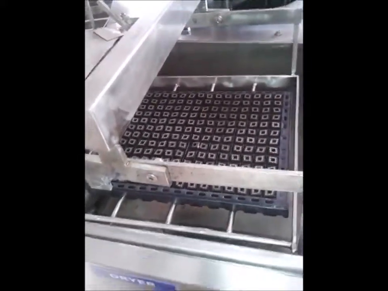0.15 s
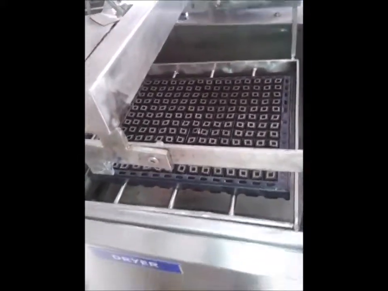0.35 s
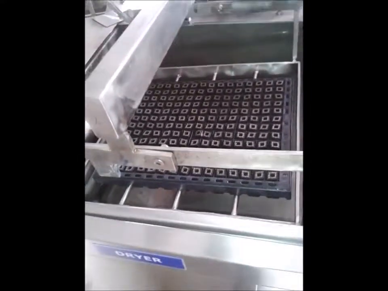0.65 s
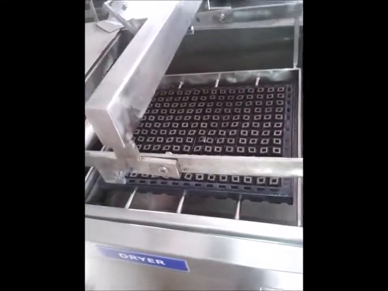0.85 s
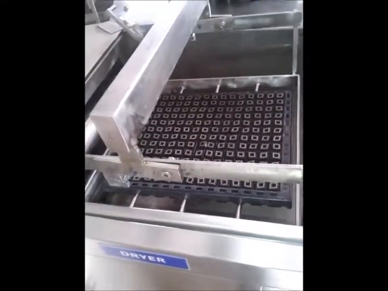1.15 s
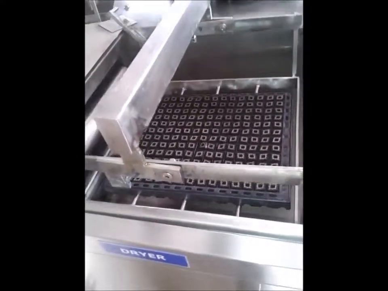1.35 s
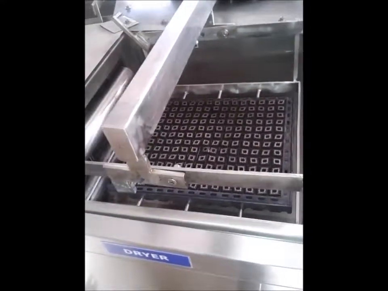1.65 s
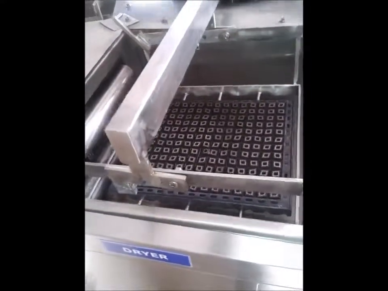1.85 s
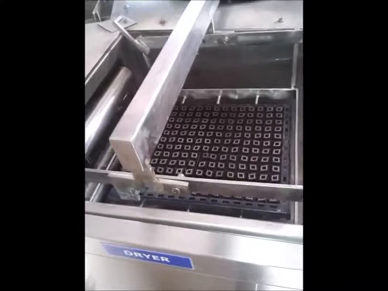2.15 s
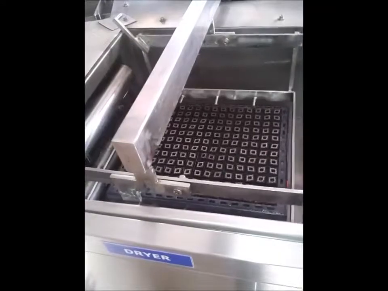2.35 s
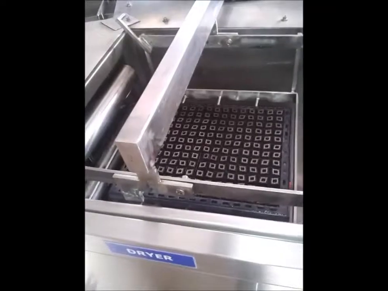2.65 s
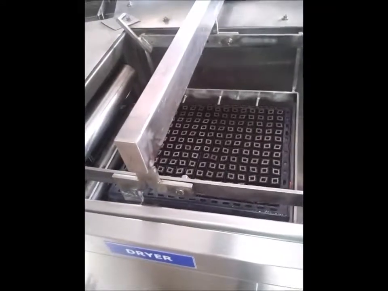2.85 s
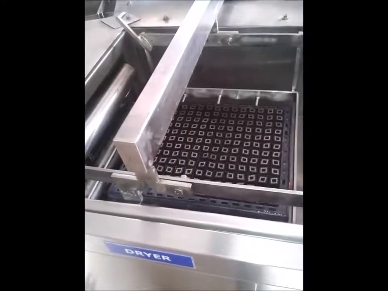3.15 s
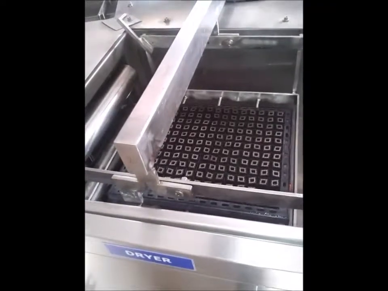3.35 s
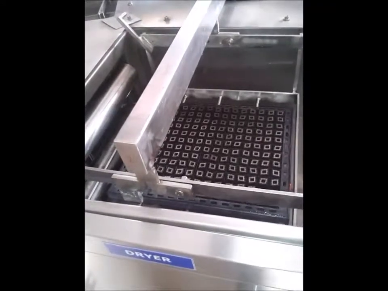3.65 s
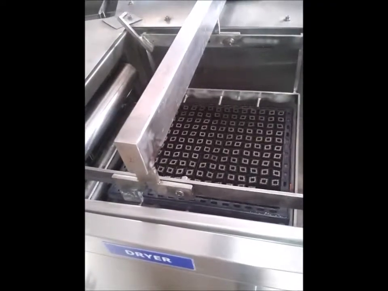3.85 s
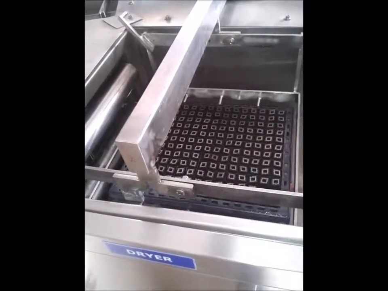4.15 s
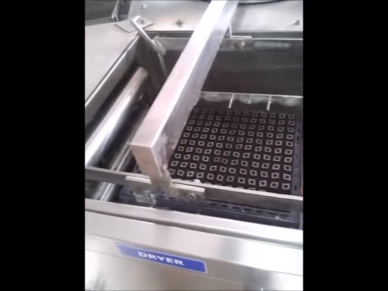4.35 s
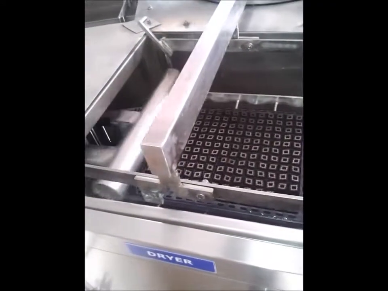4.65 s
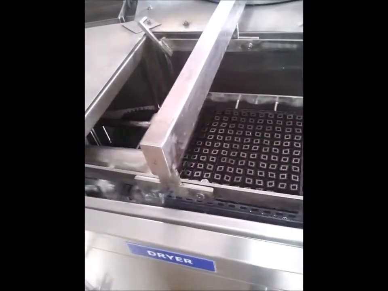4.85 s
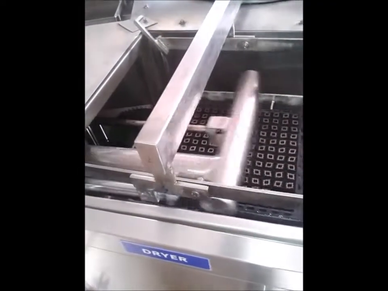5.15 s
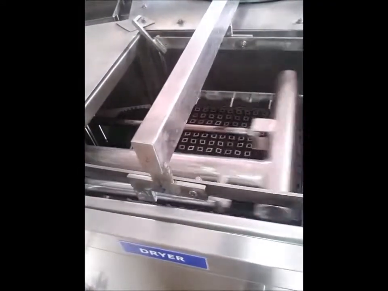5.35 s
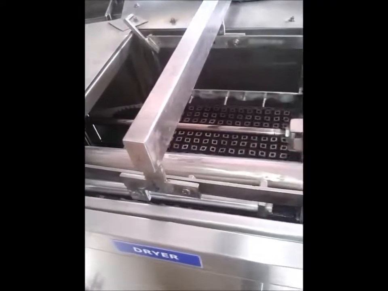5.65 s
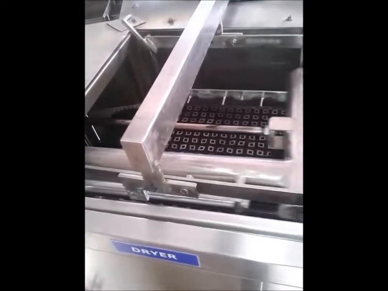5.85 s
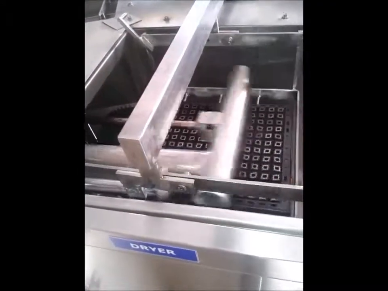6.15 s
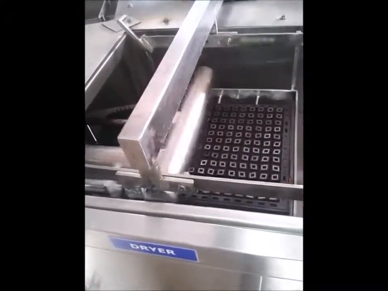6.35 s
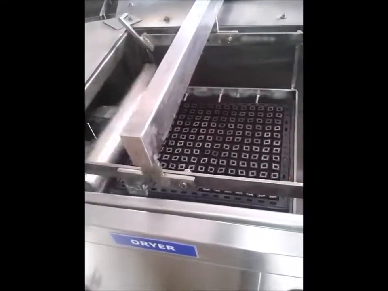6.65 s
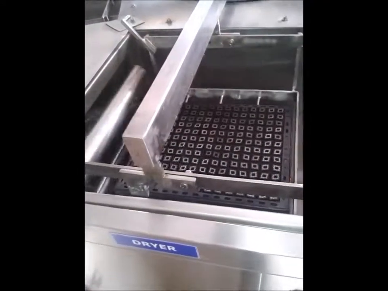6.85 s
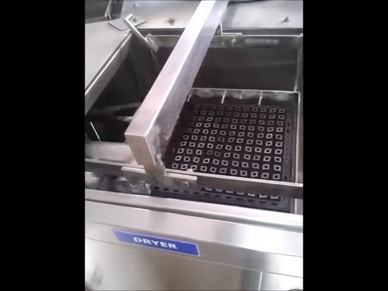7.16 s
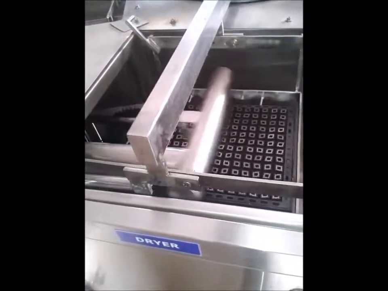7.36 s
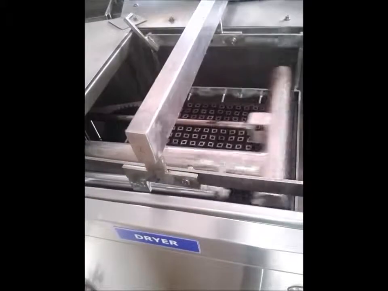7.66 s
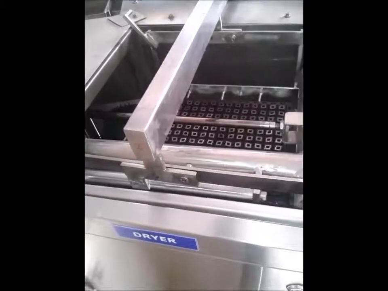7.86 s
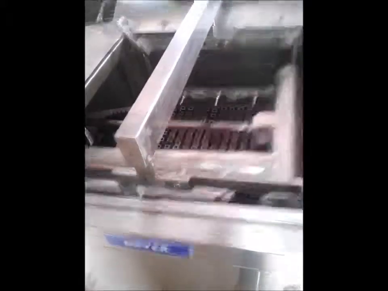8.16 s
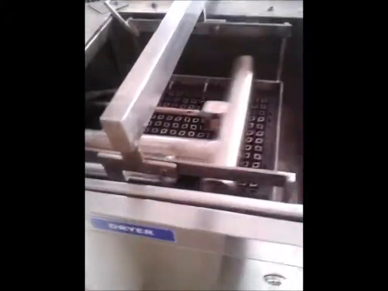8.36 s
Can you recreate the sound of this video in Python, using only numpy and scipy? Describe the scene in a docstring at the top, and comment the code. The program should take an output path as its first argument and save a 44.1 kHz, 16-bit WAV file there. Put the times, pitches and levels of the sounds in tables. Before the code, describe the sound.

A strong, steady hiss of compressed air with faint thin whistles and midrange blower roar comes first, becoming softer and narrower. It shuts off suddenly; after a brief stutter, cavitation bubbles sizzle in rapid hundred-per-second bursts, with a shrill buzzing squeal around six kilohertz and a faint low hum. Close, mono, bass-light, distorting small microphone, little sense of room.

```python
"""In a factory, a parts washer is heard close by through one small microphone that overloads.
First a jet of compressed air hisses as shaped noise, with thin tones, amid the roar of blowers.
Then the ultrasonic tank takes over: cavitation bubbles collapse in bursts on every half-wave of the mains,
as noise under a spiky envelope, and the tank squeals in combs of lines chopped at the same rate.
A low mains-rate hum sounds in wavering sines, louder while the tank squeals."""
import sys
import numpy as np
from scipy import signal
from scipy.io import wavfile
from scipy.ndimage import uniform_filter1d, map_coordinates

SR = 44100
rng = np.random.default_rng(int(sys.argv[2]) if len(sys.argv) > 2 else 0)


def store_wav(level_fs):
    """Save 16-bit WAV to argv[1]."""
    pcm = np.round(np.clip(np.atleast_2d(level_fs), -1, 1) * 32767)
    wavfile.write(sys.argv[1], SR, pcm.T.astype(np.int16))


N = 374409
T = np.arange(N) / SR  # time in seconds
CHOP_HZ = 100.0  # half-waves of the mains per second

# Cavitation in the tank. Each row: time in seconds, fizz level in dB, level of the rattling walls in dB,
# burstiness in dB (negative counts as none), chop by the half-wave in dB.
CAVITATION = [(2.36, -26.5, -27, 1, -1), (2.41, -15, -44, 4, -1), (2.5, -22.5, -32, 4, 1),
              (2.57, -14.5, -23.5, 5, 4), (2.65, -21, -28.5, 5.5, 0.5), (2.7, -26, -26.5, -7, 0),
              (2.79, -20, -23.5, 1, 0.5), (2.85, -15.5, -25.5, 3.5, 0.5), (3.1, -17, -27, 4, 0.5),
              (3.2, -19, -26.5, 5, 2.5), (3.59, -18, -27, 5, 1.5), (3.8, -14, -22.5, 2, 1),
              (3.92, -17, -26, 4, 2), (4.18, -20, -26.5, 7, 3.5), (4.36, -16, -22.5, 4, -2),
              (4.55, -16, -24.5, 5, 7.5), (4.85, -16, -25.5, 5, 1), (5.1, -15, -23, 2, 0),
              (5.55, -14.5, -25.5, 1, 0), (5.7, -15.5, -21, 4, 2), (6.1, -18.5, -26, 5.5, 3),
              (6.25, -15.5, -25, 4.5, 3.5), (6.5, -15, -23.5, 3.5, 1.5), (6.8, -16.5, -24.5, 5.5, 1.5),
              (7.1, -17, -25, 5, -0.5), (7.2, -14.5, -25, 2.5, -1), (7.5, -15, -25.5, 1, -0.5),
              (7.95, -16.5, -26, 5, 3), (8.49, -16.5, -27.5, 4.5, 0)]


def gain_of(db):
    """Amplitude ratio of a level: twenty decibels to each factor of ten."""
    return 10 ** (np.asarray(db) / 20)


def evened(x):
    """Normalization of a signal to an rms of 1."""
    return x / np.sqrt(np.mean(np.abs(x) ** 2) + 1e-20)


def curves(rows):
    """Linear interpolation of columns over time, with a soft gate open while the table lasts."""
    s, *columns = np.transpose(rows)
    # A table that reaches an end of the sound has no fade there.
    since_start = T - s[0] + (s[0] == 0)
    until_end = s[-1] - T + (s[-1] > T[-1] - .02)
    gate = np.clip(np.minimum(since_start, until_end) / .015, 0, 1)
    return gate, [np.interp(T, s, c) for c in columns]


def wander(hz, t=T):
    """Band-limited random modulation: a spline through hz random values a second, rms about 1."""
    knots = np.linspace(0, N / SR, 2000)
    smooth = map_coordinates(rng.standard_normal(400), [knots * hz], order=3, mode="wrap")
    return np.interp(t, knots, smooth)


def noise(points, patchy_db):
    """Spectral shaping of noise: random short-time spectra with drifting patches, rms 1."""
    frames, hz = N // 256 + 5, np.fft.rfftfreq(1024, 1 / SR)
    real, imaginary, patches = rng.standard_normal((frames, 513, 3)).T
    patches = uniform_filter1d(patches, size=12, axis=0)
    patches = evened(uniform_filter1d(patches, size=12, axis=1))
    f, db = np.transpose(points)
    shape_db = np.interp(np.log(hz + 1), np.log(f), db)[:, None]
    spectra = (real + 1j * imaginary) * gain_of(shape_db + patchy_db * patches)
    return evened(signal.istft(spectra, nperseg=1024, noverlap=768)[1][:N])


def swell(start, rise, hold, fall, db, change_db):
    """Amplitude envelope of one event: rise, hold with a slow change of level, fall."""
    t = T - start
    rising = t / max(rise, .005)
    falling = (rise + hold + fall - t) / max(fall, .005)
    edge = np.clip(np.minimum(rising, falling), 0, 1)
    held = np.clip((t - rise) / max(hold, .005), 0, 1)
    return edge ** 1.03 * gain_of(db + change_db * held)


def swells(rows):
    """Power sum of the envelopes of a series of events."""
    return np.sqrt(sum(swell(*row) ** 2 for row in rows))


def half_waves():
    """Phase of the mains rectification: the count of half-waves, shifted by a drifting delay."""
    # Drift of the strongest burst within the half-wave. Each row: time in seconds, delay in milliseconds.
    burst_delay = [(2.36, 4.5), (2.6, 4.6), (3.08, 6.6), (4.2, -.9), (4.4, 2.2), (4.64, 1.7), (4.76, -.1),
                   (4.88, 1.4), (5.72, 3.1), (5.84, 4.4), (6.08, .6), (6.32, 3.2), (6.44, 3.2), (6.7, 11),
                   (7.64, 7.1), (7.88, 3.9), (8.12, 2.8), (8.49, 3)]
    return CHOP_HZ * (T - curves(burst_delay)[1][0] / 1000)


def burst_envelope(mains):
    """Amplitude modulation by cavitation: two uneven, spiky bursts a half-wave over a simmer; rms 1."""
    burst_db, throb_db = curves(CAVITATION)[1][2:]
    slot = np.floor(2 * mains + .5).astype(int)  # number of each burst
    size = np.minimum(rng.standard_normal(2000)[slot], 1.3)
    pulse = np.cos(2 * np.pi * mains) ** 2
    spikes = uniform_filter1d(rng.standard_normal(N), size=40)
    spikes = evened(uniform_filter1d(spikes, size=40))
    clumps = .15 * wander(40)
    field = 1.3 * pulse + 0.33 * size * pulse + .5 * spikes + clumps
    level_db = np.clip(burst_db, 0, 12) * field + throb_db * np.cos(2 * np.pi * mains)
    bursts = gain_of(level_db) + 0.13  # steady simmer
    return bursts / np.sqrt(uniform_filter1d(bursts ** 2, size=3500))


def dips():
    """Amplitude modulation by brief Gaussian drops in level, in dB."""
    # Each row: time in seconds, half width in seconds, nominal depth in dB.
    brief_dips = [(2.58, 0.022, -5.5), (2.8, 0.02, -5), (3.14, 0.016, -2.5), (3.385, .015, -2),
                  (4.205, 0.019, -6.5), (4.75, 0.0094, -9), (4.816, .015, -4.5), (5.66, 0.03, -2.5),
                  (6.07, 0.042, -3), (6.35, 0.021, -6), (6.63, 0.036, -4.5), (6.755, .03, -5),
                  (7.005, 0.029, -3), (7.12, 0.032, -4), (8.16, 0.024, -1.5)]
    return sum(db * np.exp(-((T - s) / width) ** 2) for s, width, db in brief_dips)


def bubbles(bursts, squeal_db, dip_db):
    """Cavitation noise: each burst sprays fizz, rings harshly and shakes the tank walls."""
    # Spectra of the fizz, walls and ring. Each row: frequency in Hz, relative density in dB per Hz.
    fizz_spectrum = [(710, -15.5), (1200, -11), (2830, -13), (4160, -9), (4880, -7), (6050, -1.5),
                     (7340, -11.5), (8170, -13), (9900, -12.5), (11500, -3), (13100, -15), (15500, -15.5)]
    wall_spectrum = [(15, -55), (25, -40), (64, -45), (91, -58), (162, -48.5), (193, -13.5), (262, -5),
                     (409, 0.5), (715, 0.5), (1600, -9.5), (2500, -13.5), (3250, -11), (5500, -120)]
    ring_spectrum = [(4300, -46), (5200, 1), (5900, -3), (6300, 3.5), (7000, -8), (8200, -21)]
    # Ringing as the tank starts. Each row: start, rise, hold and fall in seconds, level in dB,
    # change over the hold in dB.
    start_ringing = [(2.355, .01, .01, .04, -16, 0), (2.49, 0.051, .09, .04, -16, 0)]
    flicker_hz = 24.92
    gate, (fizz_db, walls_db, _, _) = curves(CAVITATION)
    flicker_db = 0.71 * wander(flicker_hz)  # shared by fizz and walls
    ring_db = 3 * wander(flicker_hz) + dip_db
    # The ring grows with the squeal up to a knee at -10 dB, then yields as the tone locks.
    over_db = squeal_db + 10
    harsh = gain_of(-18.5 + 0.5 * np.minimum(over_db, 0) - 0.58 * np.maximum(over_db, 0))
    ring = np.hypot(harsh, swells(start_ringing)) * noise(ring_spectrum, patchy_db=.8)
    fizz = gain_of(fizz_db + flicker_db + 0.7 * dip_db) * noise(fizz_spectrum, patchy_db=0.7)
    walls = gain_of(walls_db + flicker_db + 1.1 * dip_db) * noise(wall_spectrum, patchy_db=0.5)
    return gate * ((fizz + gain_of(ring_db) * ring) * bursts + walls * bursts ** 0.94)


def squeal(level, pitch, mains, spread_hz, sweep, skirt, shaky_db, shake_hz, rough):
    """Periodic restarting of a tone: lines a chop apart under a moving hump, swept within the burst."""
    on = level > 0
    hz, centre_hz = (c[on] for c in curves(pitch)[1])
    turns, tone, power = np.cumsum(hz) / SR, 0, 0
    for k in range(-6, 10):
        off = (hz + k * CHOP_HZ - centre_hz) / spread_hz + 0.45  # the hump sits just under the centre
        hump = np.exp(-off ** 2 / 2) + skirt / (1 + (off - 1.5) ** 2 / 9)  # the skirt reaches further upward
        height = hump * gain_of(shaky_db * wander(shake_hz, T[on]))
        # Phase that grows as the square of the offset sweeps the pitch.
        phase = 2 * np.pi * (turns + k * mains[on]) + sweep * off ** 2 + 0.4 * wander(shake_hz, T[on])
        tone = tone + height * np.cos(phase)
        power = power + height ** 2 / 2
    # Random modulation smears part of each line into hiss.
    blur = evened(uniform_filter1d(rng.standard_normal(len(hz)), size=150))
    out = np.zeros(N)
    out[on] = tone / np.sqrt(power) * (np.sqrt(1 - rough) + np.sqrt(rough) * blur)
    return level * out


def main_squeal_level():
    """Amplitude envelope of the main comb: the squeals, and a sputter between them."""
    # Each row: start, rise, hold and fall in seconds, level in dB, change over the hold in dB.
    main_events = [(2.54, 0.2, 0.043, .07, -4.5, 0), (2.88, 0.22, 0.011, 0.071, -12, -3),
                   (3.64, 0.097, 0.084, 0.14, -6.5, 0), (3.99, 0.13, .11, .03, -20, -6),
                   (4.17, 0.27, .25, .14, -7, -6.5), (4.83, .11, 0.76, 0.16, -6, -0.5),
                   (5.72, 0.11, .01, 0.12, -7.5, -2), (5.92, 0.062, .01, 0.096, -16.5, 2.5),
                   (6.18, 0.051, 0.32, .14, -9, -1), (6.6, .04, 0.094, .03, -25, -2),
                   (6.77, 0.4, 0.38, 0.43, -9.5, 1), (7.84, .15, 0.076, 0.086, -13.5, -5)]
    # One row: start and end in seconds, level in dB, random spread in dB, rate in Hz.
    sputtering = (3, 7, -28.5, 7.5, 32)
    start, end, db, spread_db, hz = sputtering
    sputter = ((T > start) & (T < end)) * gain_of(db + spread_db * wander(hz))
    return np.hypot(swells(main_events), sputter)


def main_squeal(level, mains):
    """Line spectrum of the strongest squeal: a narrow, nearly pure comb."""
    # Each row: time in seconds, frequency of one line in Hz, centre of the comb in Hz.
    main_pitch = [(2.5, 5872, 6075), (2.8, 5872, 6085), (2.9, 5852, 6095), (3.1, 5848, 6045),
                  (3.7, 5900, 6005), (3.9, 5903, 6010), (4.15, 5905, 6060), (4.35, 5901, 5990),
                  (4.5, 5891, 5950), (4.7, 5884, 5955), (4.85, 5882, 5985), (5.0, 5859, 5910),
                  (5.5, 5859, 5890), (5.8, 5861, 5990), (6.0, 5876, 6060), (6.3, 5870, 5985),
                  (6.7, 5868, 5890), (6.9, 5868, 5945), (7.1, 5861, 5900), (7.3, 5860, 5940),
                  (7.7, 5871, 6020), (8.0, 5874, 5920), (8.3, 5874, 5945)]
    return squeal(level, main_pitch, mains, spread_hz=86.6, sweep=0.693, skirt=0.35,
                  shaky_db=3.1, shake_hz=6.6, rough=0.011)


def upper_squeal(mains):
    """Line spectrum of a higher squeal: a wide comb, largely smeared into hiss."""
    # Each row: start, rise, hold and fall in seconds, level in dB, change over the hold in dB.
    upper_events = [(2.785, .035, .14, .14, -23.5, 1), (3.07, .02, .01, .045, -20, 0),
                    (3.14, .025, .53, 0.071, -23, 1), (3.87, .09, 0.093, .08, -23, -3)]
    # Each row: time in seconds, frequency of one line in Hz, centre of the comb in Hz.
    upper_pitch = [(2.78, 7093, 7480), (3.05, 7085, 7400), (3.17, 7040, 7330), (3.45, 7031, 7330),
                   (3.55, 7002, 7480), (3.85, 7000, 7400), (4.12, 7015, 7430)]
    return squeal(swells(upper_events), upper_pitch, mains, spread_hz=300, sweep=2.2, skirt=.3,
                  shaky_db=4, shake_hz=20, rough=.6)


def start_squeal(mains):
    """Line spectrum of the highest squeal, as the tank starts: a comb of very unsteady lines."""
    # Each row: start, rise, hold and fall in seconds, level in dB, change over the hold in dB.
    start_events = [(2.38, .055, .01, .06, -20, 0), (2.48, 0.045, 0.235, 0.047, -26.5, 9)]
    # Each row: time in seconds, frequency of one line in Hz, centre of the comb in Hz.
    start_pitch = [(2.38, 11595, 11800), (2.52, 11598, 11830), (2.6, 11645, 11930), (2.68, 11655, 11500),
                   (2.86, 11650, 11350)]
    return squeal(swells(start_events), start_pitch, mains, spread_hz=165, sweep=0.89, skirt=.15,
                  shaky_db=14, shake_hz=15, rough=0.14)


def jet():
    """Turbulent noise of the air jet; the spectrum changes from open to throttled with the valve."""
    # Each row: time in seconds, level in dB, openness from 0 (throttled) to 1 (bright).
    valve = [(0, -7, 0.96), (.56, -9.5, 0.95), (.8, -8.5, 0.89), (1.0, -10, 0.85), (1.15, -13.5, .24),
             (1.4, -14, .05), (2.0, -12.5, .15), (2.2, -13, 0.27), (2.35, -10.5, 0.25), (2.375, -22, .2),
             (2.5, -29, .2)]
    # Open and throttled spectra. Each row: frequency in Hz, relative density in dB per Hz.
    open_spectrum = [(2500, -42), (3700, -20.5), (4100, -10), (5000, -12), (5350, -1), (5850, 0.5),
                     (6350, -3.5), (6900, -17), (7500, -15), (8400, -16.5), (8700, -28), (10500, -22.5),
                     (11200, -33.5), (15600, -26)]
    throttled_spectrum = [(2500, -27.5), (3800, -15.5), (4900, -8.5), (5300, -4), (5700, -1), (6400, -8),
                          (7000, -13.5), (7800, -21), (9500, -26), (11000, -31.5), (15600, -36)]
    gate, (db, openness) = curves(valve)
    openness = np.clip(openness, 0, 1)
    bright = np.sqrt(openness) * noise(open_spectrum, patchy_db=1.0)
    throttled = np.sqrt(1 - openness) * noise(throttled_spectrum, patchy_db=1.5)
    return gate * gain_of(db) * (bright + throttled)


def whistle(start, rise, hold, fall, db, change_db, first_hz, last_hz, width):
    """Narrow-band modulation: a gliding tone, partly steady and partly fluttering."""
    level = swell(start, rise, hold, fall, db, change_db)
    on = level > 0
    hz = np.linspace(first_hz, last_hz, on.sum())
    r = np.exp(-np.pi * width / SR)  # pole of the flutter filter
    real, imaginary = rng.standard_normal((2, N))[:, on]
    flutter = signal.lfilter([1 - r], [1, -r], real + 1j * imaginary)
    flutter = evened(signal.lfilter([1 - r], [1, -r], flutter))
    steady = 6 / width  # narrow tones are steadier
    carrier = np.exp(2j * np.pi * np.cumsum(hz) / SR)
    tone = np.zeros(N)
    tone[on] = ((steady + flutter) / np.hypot(steady, 1) * carrier).real
    return level * np.sqrt(2) * tone


def whistles():
    """Superposition of the thin tones."""
    # Each row: start, rise, hold and fall in seconds, level in dB, change over the hold in dB,
    # first and last frequency in Hz, bandwidth of each flutter filter in Hz.
    thin_tones = [(0, .01, .7, .1, -42, -1, 520, 513, 7), (.72, .13, .05, .25, -38, 0, 497, 495, 7),
                  (1.15, .2, .99, .05, -40, 4.5, 512, 531, 3), (.42, .18, .01, .18, -34, 0, 1010, 1005, 25),
                  (.75, .25, .01, .22, -34, 0, 995, 995, 25), (1.18, .22, .01, .22, -34, 0, 1030, 1035, 25),
                  (2.04, .06, .15, .06, -33, -3, 1090, 1010, 25), (.5, .3, .7, .35, -32, 1, 4059, 4061, 3),
                  (0, .01, 2.0, .3, -53, 1, 295, 290, 6), (2.86, .06, .63, .2, -25, 0, 6978, 6981, 70),
                  (7.98, .24, .02, .12, -29, 0, 7000, 6992, 30),
                  (0, .01, .94, .17, -32, 0, 8320, 8240, 250), (2.55, .08, .02, .04, -26, 0, 450, 490, 40),
                  (2.5, .03, .03, .03, -33, 0, 360, 400, 40), (2.68, .06, .02, .03, -33, 0, 495, 500, 60),
                  (2.7, .03, .05, .03, -32, 0, 808, 800, 80),
                  (2.49, .04, .06, .04, -25, 0, 5150, 5250, 150)]
    return sum(whistle(*row) for row in thin_tones)


def hum(squeal_db):
    """Harmonic series at the mains rate: low wavering sines, louder while the tank squeals."""
    # Each row: frequency in Hz, level in dB before it follows the squeal and wavers.
    harmonics = [(100.1, -46), (199.8, -42.5), (299.7, -42.5), (399.6, -46)]
    gate = np.clip((T - 2.85) / .3, 0, 1)
    follow_db = 0.45 * uniform_filter1d(squeal_db + 5.0, size=8000)
    total = 0
    for hz, db in harmonics:
        level = gain_of(db + follow_db + 2.5 * wander(3.11))
        total = total + level * np.sqrt(2) * np.sin(2 * np.pi * hz * T)
    return gate * total


def hall():
    """Broadband roar of the blowers, heard with a changing lift of the bass; it drops as the tank starts."""
    # Each row: frequency in Hz, relative density in dB per Hz.
    roar_spectrum = [(18, -95), (30, -65), (112, -34), (152, -23), (193, -36), (214, -21.5), (284, -15.5),
                     (462, -12.5), (511, -9), (666, -7), (1020, -3.5), (1200, -5.5), (1760, -1.5),
                     (3800, -5.5), (4940, -31), (8360, -120)]
    # Each row: time in seconds, level in dB, lift of the bass in dB.
    roar_level = [(0.0, -21, -2), (1.0, -21.5, -1), (1.6, -21.5, 2), (2.36, -22, 1), (2.39, -45, 0),
                  (2.5, -44, 0)]
    gate, (db, bass_db) = curves(roar_level)
    roar = noise(roar_spectrum, patchy_db=0.8)
    bass = signal.sosfiltfilt(signal.butter(2, 700, fs=SR, output="sos"), roar)
    return gate * gain_of(db) * (roar + (gain_of(bass_db) - 1) * bass)


def scene():
    """Superposition of all sources at the single microphone, as two equal channels."""
    mains = half_waves()
    bursts, main_level, dip_db = burst_envelope(mains), main_squeal_level(), dips()
    squeal_db = 20 * np.log10(main_level + gain_of(-31))
    squeals = main_squeal(main_level * gain_of(1.1 * dip_db), mains)
    squeals += upper_squeal(mains) + start_squeal(mains)
    # The bubbles that burst also drive the squeals.
    tank = bubbles(bursts, squeal_db, dip_db) + squeals * bursts ** 1.24
    mono = tank + jet() + whistles() + hum(squeal_db) + hall()
    return np.array([mono, mono])


def record(dry):
    """Saturation and band limiting: the input overloads, the microphone drops the deep bass, the top is cut."""
    clipped = dry / (1 + np.abs(dry / .93) ** 8) ** (1 / 8)  # firm knee
    thin = signal.sosfilt(signal.butter(3, 150, "high", fs=SR, output="sos"), clipped)
    band_limit = signal.firwin(1023, 15700, window=("kaiser", 9), fs=SR)
    return signal.oaconvolve(thin, band_limit[None], "same")


dry = scene()
out = record(dry)
store_wav(out)
```